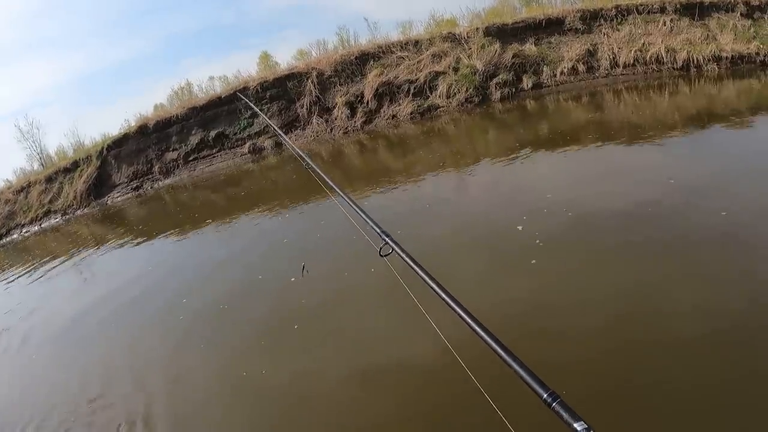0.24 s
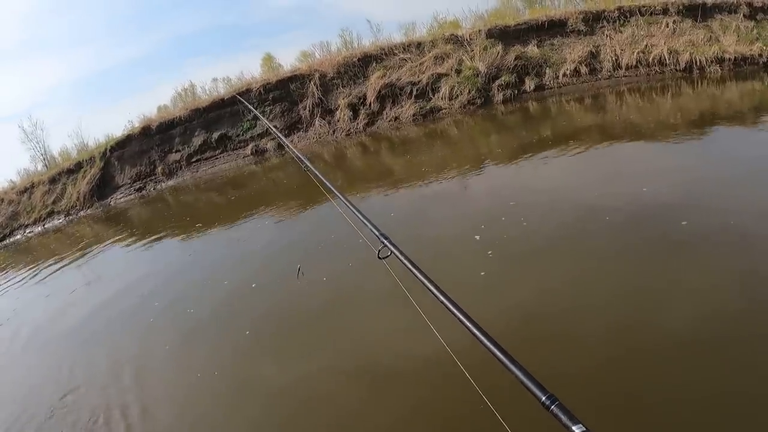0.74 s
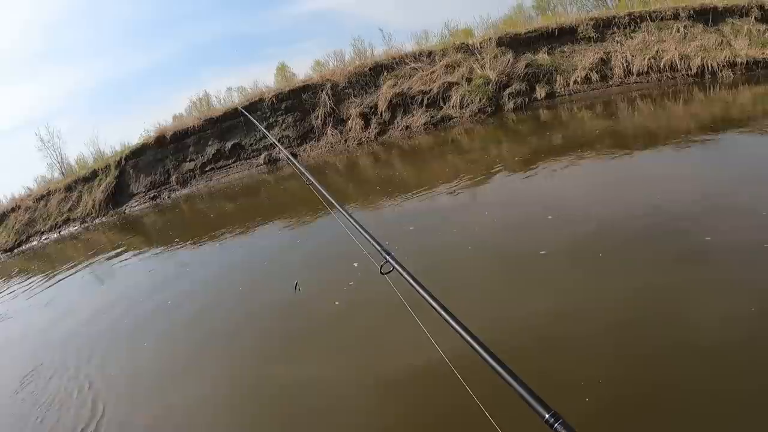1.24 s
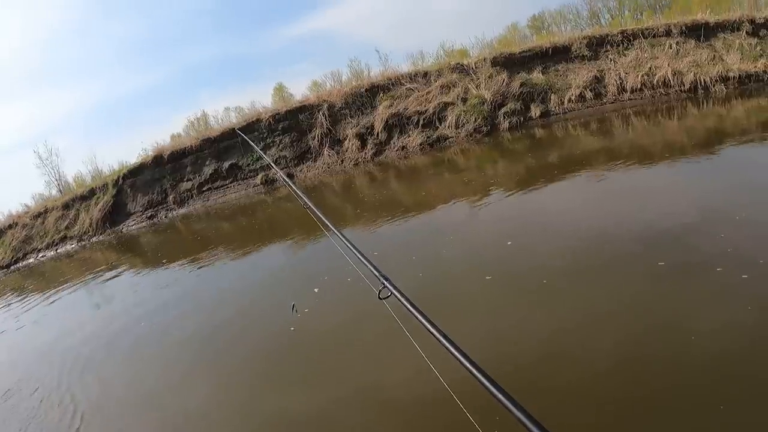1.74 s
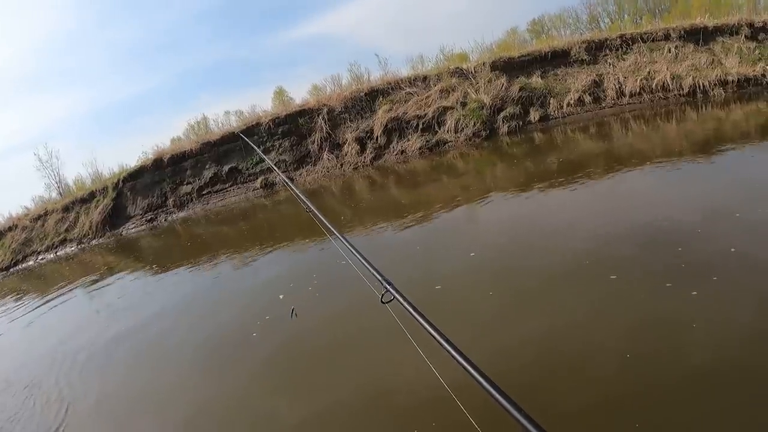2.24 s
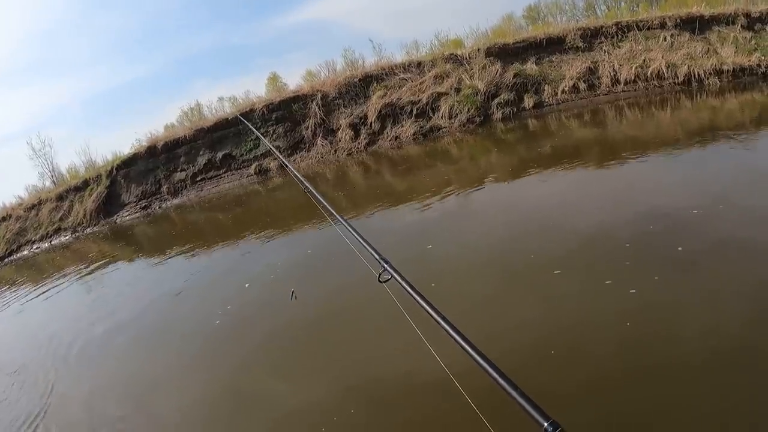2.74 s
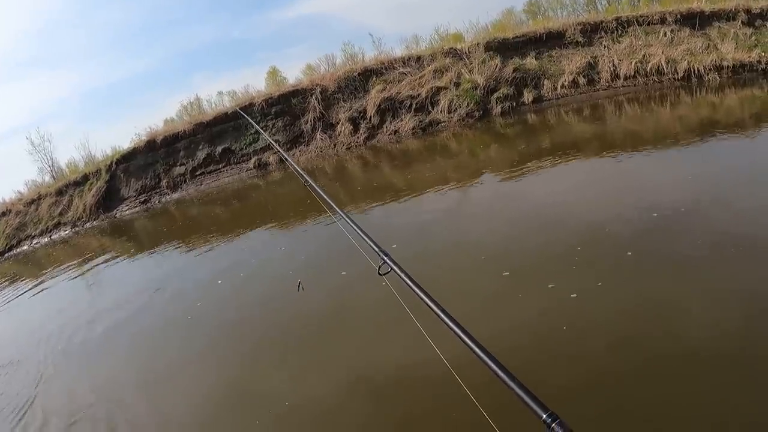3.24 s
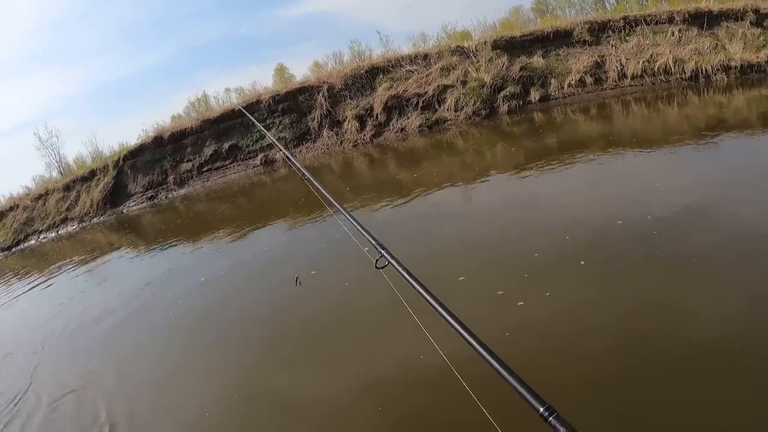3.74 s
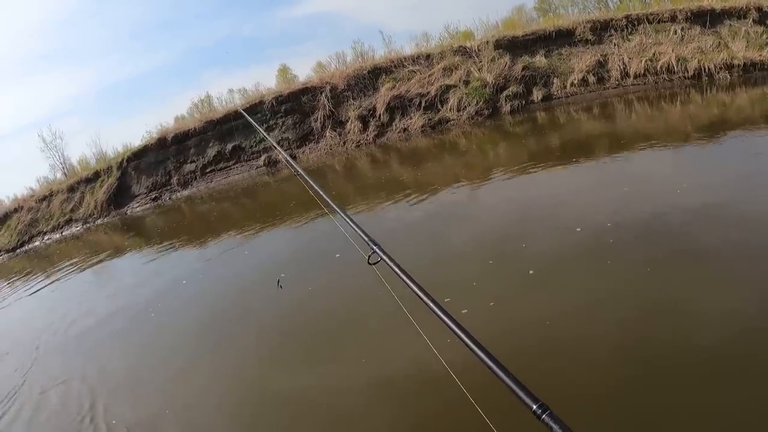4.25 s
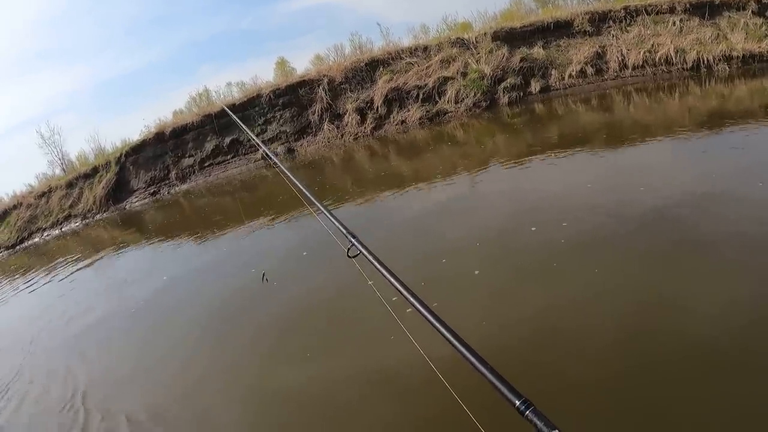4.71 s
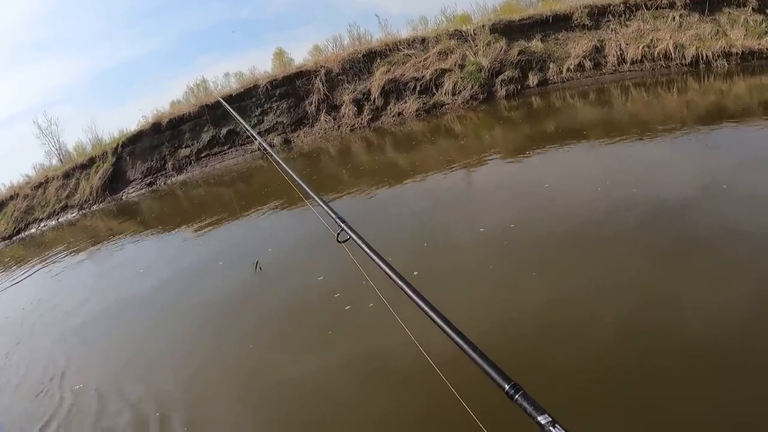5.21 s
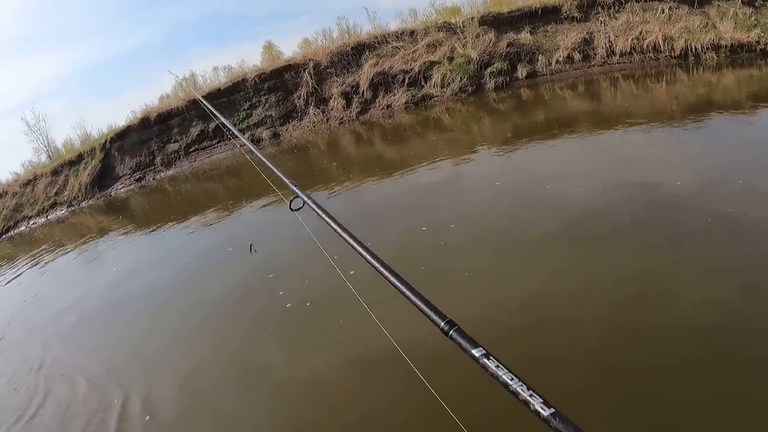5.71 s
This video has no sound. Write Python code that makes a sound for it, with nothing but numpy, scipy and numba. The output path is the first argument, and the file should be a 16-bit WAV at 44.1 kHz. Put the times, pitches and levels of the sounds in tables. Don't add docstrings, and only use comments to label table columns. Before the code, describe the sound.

Outdoors on a river, low wind rumble and soft water hush run throughout. A far bird twitters quickly at the start while tackle ticks. A close reed turkey call clucks once at half a second; after a pause with a hull boom, twelve loud raspy yelps follow evenly, each ending in a brief whistle. The microphone is close to the caller, in mono, with a faint bank echo.

```python
import sys
import numpy as np
from scipy import signal
from scipy.io import wavfile
from scipy.ndimage import uniform_filter1d
from numba import njit

SR = 44100
rng = np.random.default_rng(int(sys.argv[2]) if len(sys.argv) > 2 else 0)


def voltage_ratio(decibels):
    exponent = np.asarray(decibels, float) / 20
    return 10 ** exponent


def to_wav(sig):
    pcm = np.clip(np.atleast_2d(sig), -1, 1) * 32767
    pcm = np.round(pcm).astype(np.int16)
    wavfile.write(sys.argv[1], SR, pcm.T)


N = 263277


def unit(x):
    return x / np.sqrt(np.mean(x ** 2))


@njit
def svf(x, hz, width_hz):
    y, b, l = np.empty(len(x)), 0., 0.
    for i in range(len(x)):
        g, k = np.tan(np.pi * hz[i] / SR), width_hz / hz[i]
        v = (b + g * (x[i] - l)) / (1 + g * (g + k))
        b, l, y[i] = 2 * v - b, l + 2 * g * v, k * v
    return y


def band(x, hz, width_hz):
    hz = np.clip(hz * np.ones(len(x)), 10, SR / 2.2)
    return svf(svf(x, hz, 1. * width_hz), hz, 1. * width_hz)


def smooth(x, span_s):
    return uniform_filter1d(x, int(span_s * SR))


def walk(rate_hz, size=N):
    k = max(int(SR / rate_hz), 1)
    held = np.repeat(rng.standard_normal(size // k + 1), k)
    return 1.3 * uniform_filter1d(uniform_filter1d(held, k), k)[:size]


def steady(x, hold_s):
    return x / np.sqrt(smooth(x ** 2, hold_s) + 1e-12)


def add(out, at_s, x):
    i = int(at_s * SR)
    out[i:i + len(x)] += x[:N - i]


def hump(t, start_s, top_s, end_s):
    return np.sin(np.pi / 2 * np.interp(t, [start_s, top_s, end_s], [0, 1, 0])) ** 2


# centre_hz, density_db_per_hz
AIR_SPECTRUM = [(15, 9.5), (37, -11), (75, -11), (120, -16.5), (270, -33.5), (430, -32), (800, -40),
                (1400, -47), (2000, -60.5), (3000, -60.5), (5000, -66), (9000, -74), (16000, -82)]
# centre_hz, level_db
MOTOR_LINES = [(275, -71.5), (440, -62)]
# time_s, wind_db
GUSTS = [(0.0, -41.5), (.71, -42.5), (1.81, -41.5), (2.16, -41.5), (2.39, -40), (2.94, -42.5), (3.72, -41),
         (4.01, -37.5), (4.14, -40.5), (4.8, -41), (5.65, -41.5), (5.97, -38)]
CALM_DB, WATER_DB, WATER_FOLLOWS = -42, -56, .4


def air():
    t = np.arange(N) / SR
    spectrum_hz, spectrum_db = np.transpose(AIR_SPECTRUM)
    gust_db = np.interp(t, *np.transpose(GUSTS))
    wind, water = np.zeros((2, N))
    for hz in 16 * 2 ** np.arange(0, 10, .5):
        density_db = np.interp(np.log(hz), np.log(spectrum_hz), spectrum_db)
        gain = voltage_ratio(density_db + 1.3 * walk(12)) * np.sqrt(hz)
        layer = water if hz > 150 else wind
        layer += gain * unit(band(rng.standard_normal(N), hz, hz / 2))
    water_db = WATER_DB + WATER_FOLLOWS * (gust_db - CALM_DB) + .5 * walk(4)
    wind = unit(wind) * voltage_ratio(gust_db)
    water = unit(water) * voltage_ratio(water_db)
    motor = sum(voltage_ratio(db) * unit(band(rng.standard_normal(N), hz, 25)) for hz, db in MOTOR_LINES)
    hiss = voltage_ratio(-77.5) * rng.standard_normal(N)
    return voltage_ratio(4.5) * wind + voltage_ratio(2) * water + motor + hiss


RUSTLE_HZ = (3800, 6100, 8000, 10300)
RUSTLE_S, RUSTLE_DB = (5.8, 5.9, 6.02), -76


def rustle():
    drag = np.zeros(N)
    for hz in RUSTLE_HZ:
        drag += unit(band(rng.standard_normal(N), hz, 1500)) * voltage_ratio(3 * walk(70)) * 3800 / hz
    return voltage_ratio(RUSTLE_DB) * hump(np.arange(N) / SR, *RUSTLE_S) * drag


# start_s, peak_db, pitch_hz
PEEPS = [
    (0.251, -59.5, 1790),
    (1.115, -75, 3820),
    (1.535, -73.5, 3804),
    (1.575, -58, 1394),
]
BIRD_START_S, BIRD_EVERY_S = .0445, .0887
BIRD_DB, BIRD_SWELL_DB = -62, 0.4


def bird():
    out, t = np.zeros(N), np.arange(1800) / SR
    sag = 2 * np.pi * (t - .5 * t ** 2)
    for k in range(9):
        s, db = BIRD_START_S + k * BIRD_EVERY_S, BIRD_DB + k * BIRD_SWELL_DB
        add(out, s - .006, voltage_ratio(db) * hump(t, 0, .013, .034) * np.sin(3370 * sag))
        if k < 8:
            add(out, s + .055, voltage_ratio(db - 9) * hump(t, 0, .014, .034) * np.sin(5160 * sag))
    for s, db, hz in PEEPS:
        add(out, s, voltage_ratio(db) * hump(t, 0, .014, .034) * np.sin(hz * sag))
    age = np.arange(SR // 3) / SR
    trees = rng.standard_normal(len(age)) * np.exp(-age / .07)
    return out + voltage_ratio(-16) * signal.fftconvolve(out, trees / np.linalg.norm(trees))[:N]


# start_s, peak_db, centre_hz, t60_s
TICKS = [(0.0869, -34, 3430, 0.013), (0.1662, -53, 5000, .006), (0.358, -53.5, 6260, .04),
         (0.4752, -35.5, 3800, .02), (0.535, -50.5, 4460, 0.061), (0.6434, -43.5, 5100, .01),
         (.6514, -32, 3500, 0.013), (0.6904, -51, 5700, .006), (0.735, -52.5, 2500, 0.0095),
         (2.4708, -46.5, 3430, 0.011), (3.776, -50, 2970, .01), (3.812, -58, 3100, 0.0099),
         (3.836, -45, 1300, 0.017), (4.943, -41.5, 1470, 0.0051), (4.95, -48.5, 1300, 0.0052),
         (5.223, -41.5, 1604, 0.0077), (5.232, -42, 2500, 0.0051), (5.7714, -44.5, 6240, 0.0204),
         (5.7858, -51, 5700, 0.0398), (5.8668, -50.5, 5500, 0.0085), (5.9685, -44, 2970, 0.0096)]


def ticks():
    out, t = np.zeros(N), np.arange(2600) / SR
    for s, db, hz, t60_s in TICKS:
        burst = rng.standard_normal(len(t)) * 1000 ** (-t / t60_s)
        tick = band(burst, hz, .3 * hz) + .3 * band(burst, hz, .9 * hz)
        tick = tick + .9 * band(burst, hz / 2.4, hz / 2.2)
        add(out, s, voltage_ratio(db) * tick / np.abs(tick).max())
    return out


# start_s, strength_db, rattle_s, deepest_mode_db
KNOCKS = [
    (0.149, -28, 0.0043, -15.5),
    (0.702, -22.5, 0.0014, -23),
    (0.7225, -34, .002, -19),
    (0.727, -26, 0.0025, -31),
    (0.761, -26.5, 0.0024, -17.5),
    (1.8324, -16, 0.023, -1),
    (5.802, -30, 0.009, -4.5),
]
# centre_hz, width_hz, level_db
HULL = [(183.8, 40, 0), (364, 114, 1.5), (546, 100, -1), (708, 300, -3.5), (1300, 250, -11.5),
        (2500, 1500, -56)]


def knocks():
    out, t = np.zeros(N), np.arange(SR // 4) / SR
    for s, db, rattle_s, deep_db in KNOCKS:
        boom = voltage_ratio(deep_db) * np.sin(2 * np.pi * HULL[0][0] * t) * hump(t, 0.0031, 0.0041, 0.035)
        contact = rng.standard_normal(len(t)) * np.exp(-t / rattle_s)
        softness = 1.5 - deep_db / 35
        rattle = sum(voltage_ratio(mode_db * softness) * band(contact, hz, w) for hz, w, mode_db in HULL[1:])
        slosh = unit(band(rng.standard_normal(len(t)), 240, 440)) * np.exp(-t / 0.069)
        knock = boom + 0.28 * rattle / np.abs(rattle).max() + voltage_ratio(deep_db - 26.0) * slosh
        add(out, s, voltage_ratio(db) * knock)
    return out


# loudest_s, swell_s, pitch_hz (at loudest), peak_db
WHISTLES = [(2.535, 0.01, 1165, -14.5), (2.814, 0.004, 1305, -11.5), (3.092, 0.0092, 1414, -21),
            (3.4, 0.0072, 1366, -22), (3.688, .007, 1435, -14), (3.97, .009, 1422, -13),
            (4.231, 0.0059, 1545, -13.5), (4.516, 0.004, 1505, -16.5), (4.767, 0.0053, 1484, -13),
            (5.033, 0.0055, 1487, -10.5), (5.311, 0.015, 1480, -10), (5.572, 0.025, 1419, -9.5)]
WHISTLE_FADE_S, WHISTLE_RISE_HZ_PER_S = 0.0097, 6400
# loudest_s, peak_db
SQUEAKS = [
    (4.959, -17),
    (5.236, -14),
    (5.501, -26),
]
SQUEAK_RISE_S, SQUEAK_FADE_S, SQUEAK_HZ, SQUEAK_FALL_HZ_PER_S = 0.0043, 0.011, 1900, 29000
# loudest_s, swell_s, fade_s, pitch_hz, rise_hz_per_s, peak_db
CLUCK_WHISTLE = (.496, .005, .009, 1450, 48700, -5)


def whistles():
    tone, free, t = np.zeros(N), np.ones(N), np.arange(N) / SR
    ends = [(s, swell_s, WHISTLE_FADE_S, hz, WHISTLE_RISE_HZ_PER_S, db) for s, swell_s, hz, db in WHISTLES]
    starts = [(s, SQUEAK_RISE_S, SQUEAK_FADE_S, SQUEAK_HZ, -SQUEAK_FALL_HZ_PER_S, db) for s, db in SQUEAKS]
    for top, swell_s, fade_s, hz, glide, db in [CLUCK_WHISTLE] + ends + starts:
        start, end = top - swell_s, top + fade_s
        k = slice(int((start - .02) * SR), int((end + .02) * SR))
        pitch_hz = hz + glide * (np.clip(t[k], start, end) - top)
        phase = 2 * np.pi * np.cumsum(pitch_hz) / SR
        swell = hump(t[k], start, top, end)
        tone[k] += voltage_ratio(db) * swell * (np.sin(phase) + voltage_ratio(-44) * np.cos(2 * phase))
        locked = t[k] > top if glide > 0 else t[k] < top
        free[k] = np.where(locked, .1, 1 - .9 * swell)
    return tone, free


def slaps(hz, rough, size):
    chance = rng.standard_normal((120, 2)).T
    at = np.cumsum(SR / hz * np.clip(1 + 0.27 * rough * chance[0], .3, 2))
    keep = at < size - 2
    i, part = at[keep].astype(int), at[keep] % 1
    blow = voltage_ratio(0.87 * rough * chance[1][keep])
    pulses = np.zeros(size)
    pulses[i] -= blow * (1 - part)
    pulses[i + 1] -= blow * part
    return unit(pulses) + 1.7 * rough * rng.standard_normal(size)


def between(pair, tension):
    loose, tight = np.asarray(pair, float)
    return loose + tension * (tight - loose)


# full_db, then drop_db at catch, release, end
LOOSE = [(-14, 0.5, 6.2, 31), (-20.5, -1.5, 34, 45), (-21.5, 3, 1.3, 8.2), (-18.5, -0.53, 8, 15)]
# full_db, then drop_db at catch, release, end
TIGHT = [(-24, 4.5, 3.9, 40), (-32, 19, 12, 38), (-18, 18, 7, 6.4), (-11.5, 6.6, 5, 9)]
LEAK_DB = (-57.5, -62, -43.5, -49.5)
FULL_SHARE, RELEASE_SHARE = 0.46, 0.75
MIDDLING_CORE_DB, MIDDLING_CATCH_DB, MIDDLING_LET_GO_DB = 10, 3, 4.5


def breath(catch_s, length_s, db, tension, lead_s):
    s = catch_s + np.array([-lead_s, 0, FULL_SHARE * length_s, RELEASE_SHARE * length_s, length_s])
    full, at_catch, at_release, at_end = between((LOOSE, TIGHT), tension).T
    levels = db + np.array([LEAK_DB, full - at_catch, full, full - at_release, full - at_end])
    middling = max(4 * tension * (1 - tension), 0)
    levels[2, 2] += MIDDLING_CORE_DB * middling
    levels[1, 2:] += MIDDLING_CATCH_DB * middling
    levels[3:, :2] -= MIDDLING_LET_GO_DB * middling
    return s, levels.T


# centre_hz, width_hz
CAVITY = [(994, 151), (668, 160), (1345, 190), (1579, 110), (1817, 209)]


def cavity(source, rough, tuning):
    size, rings = len(source), []
    for tune, (hz, width_hz) in zip(tuning, CAVITY):
        drift = 1 + 0.037 * walk(49.8, size=size)
        ring = steady(band(source, tune * hz * drift, width_hz), 0.025)
        rings.append(ring * unit(voltage_ratio(3 * np.sqrt(rough) * walk(130, size=size))))
    return rings


# centre_hz, width_hz, level_db
UPPER = [(2324, 540, -25), (2580, 240, -28.5), (2978, 670, -25), (3603, 260, -28.5), (4800, 920, -37),
         (5700, 670, -38.5), (8700, 740, -52.5), (10000, 900, -57), (11140, 1700, -55),
         (13400, 1100, -63.5)]
PATCHY_DB = 3


def upper_modes(breathy, top_db):
    out = np.zeros(len(breathy))
    for hz, width_hz, db in UPPER:
        level_db = db + top_db * (hz > 9000) + PATCHY_DB * walk(60, size=len(breathy))
        out += voltage_ratio(level_db) * unit(band(breathy, hz, width_hz))
    return out


# catch_s, length_s, level_db, tension_0_1, lead_s (leak before the catch)
NOTES = [(.4893, .022, 2.5, -.1, .014), (2.487, .073, -1.5, 0, .025), (2.756, 0.087, 0, 0.03, .034),
         (3.022, 0.094, -2, .4, .032), (3.333, 0.083, 0.9, 0.05, .018), (3.6, 0.11, 0.23, 0.29, .02),
         (3.879, 0.11, -1, 0.36, .024), (4.149, 0.1, 0.17, 0.42, .022), (4.427, 0.11, -0.5, 0.41, .028),
         (4.693, 0.093, -0.5, 0.44, .026), (4.959, 0.083, -0.66, 1, .018), (5.233, 0.093, -0.6, 0.99, .014),
         (5.497, 0.1, -1.5, 0.76, .014)]
# slap_hz, roughness_0_1
REED = [(620, .1), (293, .25), (321, .15), (331, .8), (334, .3), (326, .7), (326, .6), (326, .75),
        (326, .7), (321, .7), (321, .7), (320, .6), (331, .6)]
# centre_hz, width_hz, level_db
JET = (7656, 460, -40)
NOMINAL_SLAP_HZ = 325
TREBLE_DB, EDGE_DB, JUMP_DB = (-1.5, -2.5), (8.5, -10.5), (5, 1)
JUMP_MIDDLING_DB = 2.5
CLUCK_JUMP_DB, CLUCK_UPPER_DB, CLUCK_EDGE_DB = 3, 3.5, 11
LOOSE_TOP_LIFT, LOOSE_BELOW = .05, .25


def rasp():
    out, top, jet = np.zeros((3, N))
    for (catch_s, length_s, note_db, tension, lead_s), (hz, rough) in zip(NOTES, REED):
        s, columns = breath(catch_s, length_s, note_db, tension, lead_s)
        doubled = round(hz / NOMINAL_SLAP_HZ)
        pitch = hz / doubled / NOMINAL_SLAP_HZ
        treble_db = between(TREBLE_DB, tension)
        if doubled > 1:
            jump_db, top_db = CLUCK_JUMP_DB, CLUCK_EDGE_DB
            columns[-1] += CLUCK_UPPER_DB
        else:
            jump_db = between(JUMP_DB, tension) + JUMP_MIDDLING_DB * np.sin(np.pi * tension)
            top_db = between(EDGE_DB, tension)
        size = int((s[-1] - s[0]) * SR)
        t = s[0] + np.arange(size) / SR
        leak_db = np.interp(t, [catch_s - .002, catch_s + .001], [-jump_db, 0])
        second, low, core, upper = (voltage_ratio(np.interp(t, s, c) + leak_db) for c in columns)
        effort = np.sqrt(low ** 2 + second ** 2 + core ** 2 + upper ** 2)

        slack = np.clip(1 - tension / LOOSE_BELOW, 0, 1)
        source = slaps(hz, rough, size)
        ring = cavity(source, rough, [pitch] * 4 + [1 + LOOSE_TOP_LIFT * slack])
        body = low * ring[1] - second * ring[0] + core * ring[2]
        body = body + upper * (ring[4] - ring[3]) / np.sqrt(2)
        swing = body / effort
        body = body * (smooth(swing ** 2, .0025) + .1) ** -.22
        body = body - .06 * (body ** 2 - smooth(body ** 2, .003))

        breathy = np.abs(swing) * rng.standard_normal(size) + 0.2 * source
        treble = upper_modes(breathy, top_db)
        edge = np.clip(np.minimum(np.arange(size), size - np.arange(size)) / (0.013 * SR), 0, 1)
        add(out, s[0], edge * body)
        add(top, s[0], edge * voltage_ratio(treble_db) * effort * (effort / 0.58) ** 0.18 * treble)
        jet_hz, jet_width_hz, jet_db = JET
        hiss = unit(band(breathy + rng.standard_normal(size), jet_hz, jet_width_hz))
        add(jet, s[0], edge * voltage_ratio(jet_db + treble_db) * effort * (effort / .2) ** -.3 * hiss)
    return out, top, jet


BANK_S, BANK_SPREAD_S, BANK_DB = .1, .04, -47


def echoes(near):
    t = np.arange(SR // 2) / SR
    near_tail = voltage_ratio(-35.5) * np.exp(-t / .008) / np.sqrt(0.0027 * SR)
    bank = voltage_ratio(BANK_DB) * np.exp(-.5 * ((t - BANK_S) / BANK_SPREAD_S) ** 2) / np.sqrt(BANK_SPREAD_S * SR)
    clumps = voltage_ratio(5.5 * walk(60, size=len(t)))
    echo = (near_tail + bank * clumps) * rng.standard_normal(len(t))
    echo = echo + 1.4 * band(echo, 5200, 6000)
    return signal.fftconvolve(near, echo)[:N]


# time_s, gain_db
SLIPS = [(2.505, -1), (2.515, -2.5), (2.771, -29.5), (3.07, -2), (3.346, -11), (3.361, -8.5), (3.375, -2),
         (3.677, -9.5), (3.958, -4.5), (4.154, -4.5), (4.169, -12.5), (4.494, -7.5), (4.751, -5.5),
         (4.968, 0), (5.008, 1.5), (5.245, 4.5), (5.284, -6), (5.51, -1.5)]


def call():
    tone, free = whistles()
    reed, top, jet = rasp()
    t = np.arange(N) / SR
    grip = voltage_ratio(sum(db * np.exp(-((t - s) / 0.0014) ** 2) for s, db in SLIPS))
    near = reed * grip * free + top * grip ** .5 * free ** 0.42 + jet + tone
    return near + echoes(near)


def scene():
    return (air() + rustle() + bird() + ticks() + knocks() + call())[None]


def top_cut(x):
    return signal.sosfilt(signal.butter(12, 15760, fs=SR, output="sos"), x)


# start_s, end_s
GAP_S = (1.1655, 1.1725)


def record(dry):
    dry = dry / (1 + (dry / .92) ** 8) ** (1 / 8)
    start_s, end_s = GAP_S
    live = np.interp(np.arange(N) / SR, [start_s - .0025, start_s, end_s, end_s + .003], [1, 0, 0, 1])
    return top_cut(dry * live)


dry = scene()
out = record(dry)
to_wav(out)
```